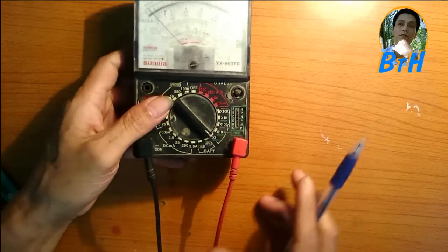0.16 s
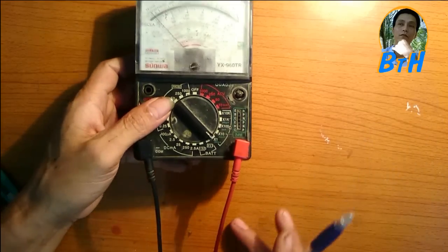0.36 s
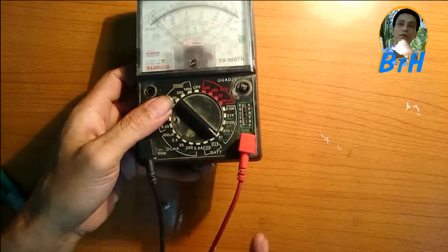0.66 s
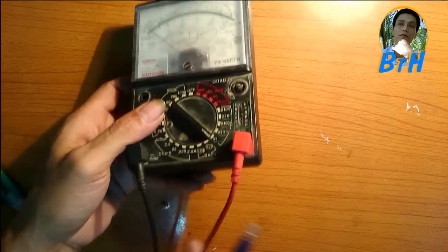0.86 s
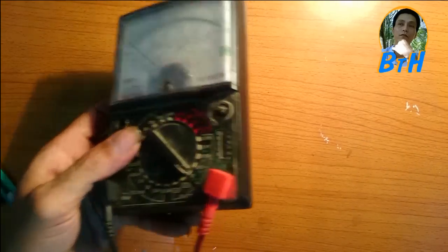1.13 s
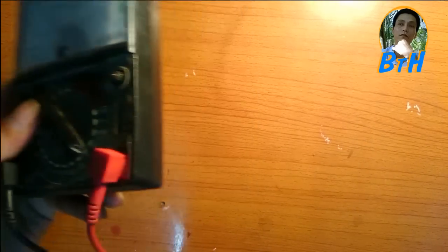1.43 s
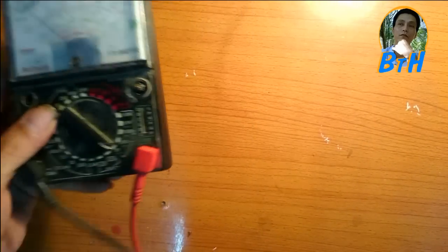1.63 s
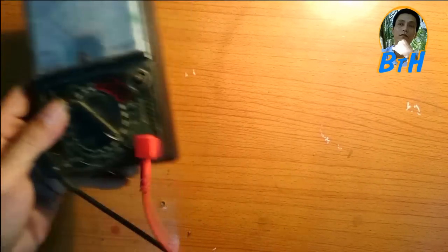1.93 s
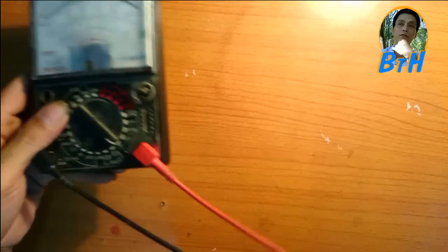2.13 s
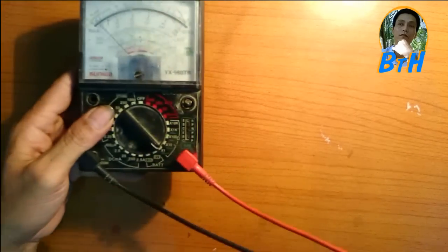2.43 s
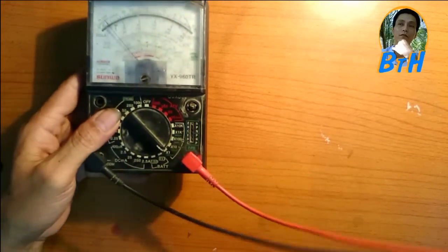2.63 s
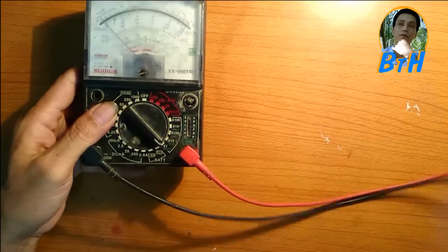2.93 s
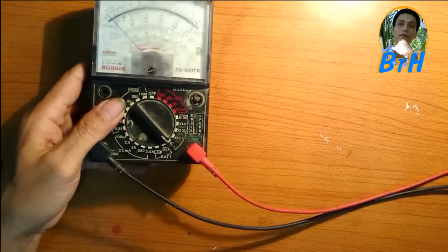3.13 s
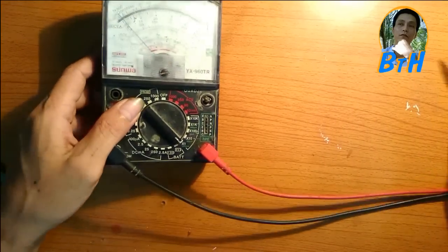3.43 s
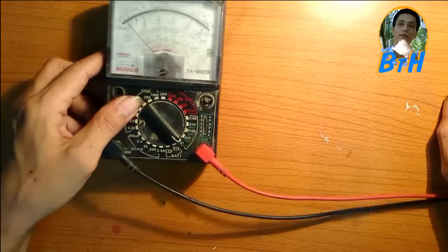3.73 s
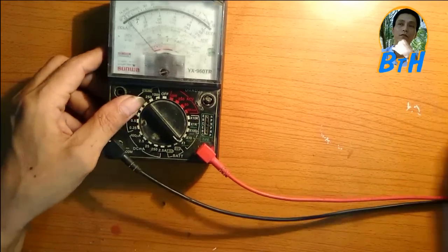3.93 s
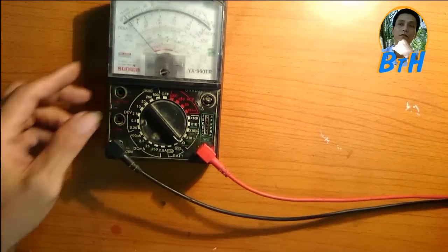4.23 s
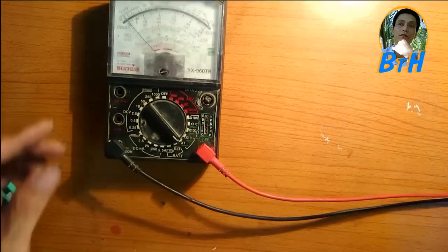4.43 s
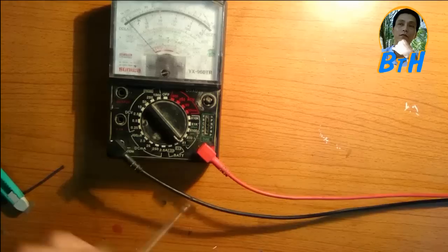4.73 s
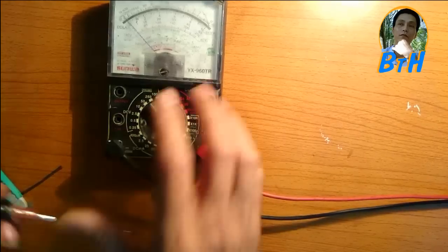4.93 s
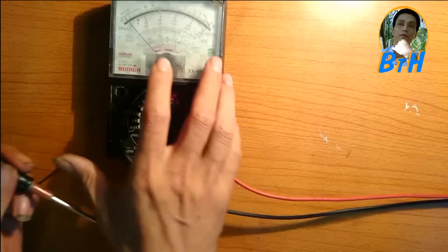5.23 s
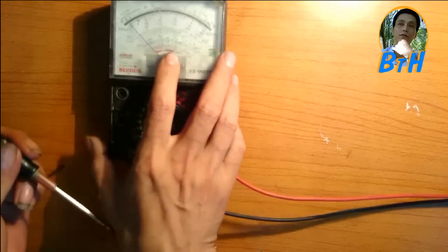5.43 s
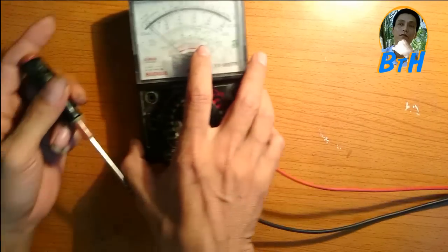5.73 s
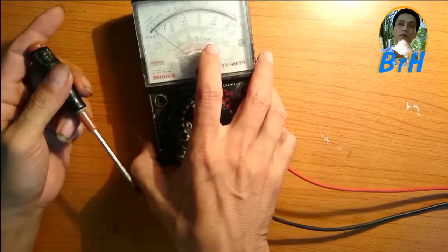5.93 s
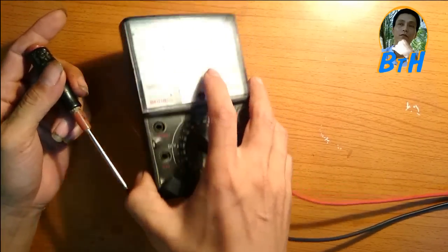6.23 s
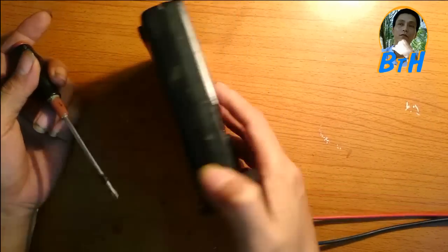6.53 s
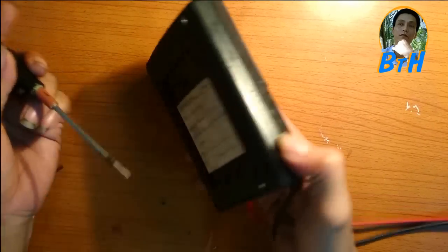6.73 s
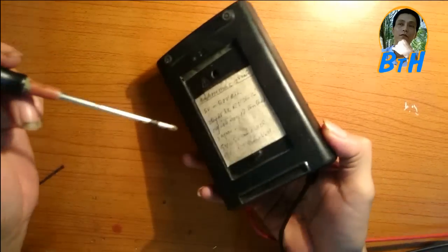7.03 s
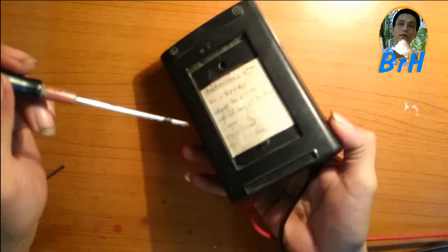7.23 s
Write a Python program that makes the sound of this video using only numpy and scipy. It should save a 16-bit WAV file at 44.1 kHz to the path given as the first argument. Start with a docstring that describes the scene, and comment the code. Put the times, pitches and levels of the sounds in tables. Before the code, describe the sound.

Light knocks and sharp clicks of a plastic meter case handled on a wooden table, with soft scrapes over a low hum.

```python
"""Hands busy at a wooden table

Hands move a small plastic meter, its leads and a few tools about on a wooden table in a quiet room.
Knocks ring the case and the table top as dying tones; hard parts click in short bursts of noise.
Sliding things hiss in uneven grains. A hum, a rumble, a far engine, a faint far tone and air hiss lie
under it, with a thin squeak. Two microphone ports listen; the right one takes up more of the wood's bass.
"""
import sys
import numpy as np
from scipy import signal
from scipy.fft import rfft, irfft, next_fast_len
from scipy.io import wavfile
from scipy.ndimage import uniform_filter1d

SR = 44100
rng = np.random.default_rng(int(sys.argv[2]) if len(sys.argv) > 2 else 0)


def persist_wave(psi):
    """Save psi, clipped to +-1, as 16-bit WAV."""
    counts = np.round(np.clip(psi, -1, 1) * 32767).astype(np.int16)
    wavfile.write(sys.argv[1], SR, np.atleast_2d(counts).T)


N = 324569  # length in samples

# Room tone and microphone hiss. Each row: pitch in Hz, strength in dB (only the shape counts).
AIR_SPECTRUM = [(35, -54.5), (60, -9.5), (98, -24.5), (149, -28.5), (243, -35.5), (300, -32.5), (361, -36),
                (467, -36.5), (576, -32.5), (647, -34), (727, -38.5), (4700, -43), (5800, -34.5),
                (6510, -40), (15800, -56)]
# How the air changes. Each row: time in seconds, hiss level in dB, lift of the bass in dB.
AIR_LEVEL = [(0.0, -65, 3), (0.92, -66.5, 10.5), (1.62, -66, 8), (2.7, -70, 8.5), (3.0, -64, 4.5),
             (3.7, -69, 20.5), (3.87, -58.5, 19), (4.03, -70, 22.5), (4.39, -64.5, 6), (4.61, -71, 13),
             (5.23, -69.5, 9), (5.79, -63, -5), (6.01, -69, 4), (6.47, -63.5, 5.5), (6.79, -70, 12),
             (7.2, -69.5, 9), (7.21, -61, 12.5), (7.36, -61.5, 20.5)]
# How alike the air is at both ports. Each row: pitch in Hz, likeness (1 is the same, 0 unrelated).
AIR_LIKENESS = [(60, 0.076), (180, 0.44), (550, 0.46), (1650, 0.076), (4970, -0.051), (15000, 0.51)]
# Balance of the air. Each row: pitch in Hz, left minus right in dB.
AIR_BALANCE = [(60, -3.5), (180, -4), (550, 1), (1650, 0.5), (4970, -1), (15000, 8.5)]
# The hum swells and sinks. Each row: time in seconds, level midway between the ports in dB.
HUM_LEVEL = [(0.0, -58), (0.12, -53), (1.0, -78), (1.41, -56), (1.8, -63), (3.26, -47), (4.26, -62),
             (4.37, -51), (4.67, -54), (4.73, -42.5), (4.9, -57), (4.94, -49.5), (5.43, -57.5), (5.49, -75),
             (5.62, -61), (7.17, -59.5), (7.26, -42.5), (7.36, -40.5)]
# The rumble swells and sinks. Each row: time in seconds, level at the right port in dB.
RUMBLE_LEVEL = [(0.0, -48), (1.6, -46), (1.66, -81), (1.76, -34), (1.86, -48.5), (1.99, -33.5), (2.17, -52),
                (2.29, -39), (3.22, -36), (4.78, -32), (4.96, -46), (5.08, -33.5), (5.68, -54), (6.01, -30),
                (6.74, -58.5), (7.13, -35), (7.15, -36), (7.36, -52)]
# Steady tones of a far idling engine. Each row: pitch in Hz, level in dB before the gain below.
ENGINE_LINES = [(81, -63), (108, -67.5), (136, -63), (163, -64.5), (190, -76.5), (245, -77.5)]
# The engine comes and goes. Each row: time in seconds, gain in dB.
ENGINE_GAIN = [(0, -8), (.5, -5.5), (1.5, -1.5), (2.6, -1), (3.3, -5.5), (4.2, -4), (4.8, -21)]
# A faint far tone. Each row: time in seconds, pitch in Hz, level in dB.
HOOT = [(4.95, 733, -92), (5.03, 753, -77), (5.085, 730, -73), (5.2, 720, -94.5)]
# A thin high squeak. Each row: time in seconds, pitch in Hz, level in dB.
SQUEAK = [(2.0, 10800, -74), (2.084, 11200, -86), (2.148, 11300, -68), (2.224, 10300, -87),
          (2.296, 11000, -84), (2.41, 10600, -90)]
# Tones of the plastic case, in a low, a middle and a high family.
# Each row: pitch in Hz, level in dB within its family, seconds to die by 60 dB at factor 1.
CASE_TONES = [
    [(468.8, -10, 0.24), (504.6, -5, 0.1), (638.6, 13, 0.034), (634, -18.5, 0.43), (755, -6, 0.11)],
    [(1123, 4, 0.028), (1230, 9.5, 0.025), (1439, -4.5, 0.055)],
    [(1752, -5.5, 0.05), (2163, -12, 0.027)],
]
# Tones of the table top, with the same families and columns.
TABLE_TONES = [
    [(86, 0, 0.64)],
    [(120, 4.5, 0.22), (140.3, 5.5, 0.26), (177.2, -9, 0.22)],
    [(215.4, -2, 0.24), (240, 2.5, 0.18), (282.8, -4.5, 0.22), (342, -2.5, 0.07)],
]
# Sliding strokes. Each row: strongest moment in seconds, swell in seconds, fade in seconds,
# scratch of the contact in dB, its fine hiss in dB, case ring in dB, table ring in dB.
SLIDES = [(0.49, 0.1, 0.043, -75, -86, -59, -66), (0.61, 0.021, 0.065, -78, -67, -85, -66),
          (1.419, 0.018, 0.083, -57, -56.5, -56, -43), (1.513, 0.091, 0.11, -56.5, -56, -62, -50.5),
          (1.669, 0.0091, 0.16, -59.5, -64, -54.5, -57), (1.769, 0.053, 0.032, -72, -73, -65, -74),
          (2.066, 0.11, 0.078, -68.5, -63, -68.5, -68), (2.75, 0.012, 0.035, -55.5, -55, -52, -52),
          (2.784, 0.028, 0.044, -61, -58.5, -60.5, -57), (2.919, 0.052, 0.066, -59, -60, -54.5, -52),
          (2.998, 0.036, 0.051, -56.5, -53.5, -57, -62), (3.363, 0.007, 0.19, -71, -73, -64, -63),
          (3.7, .006, 0.025, -73, -46, -63, -51), (3.799, 0.052, 0.07, -43, -45, -47, -59),
          (4.163, 0.012, 0.035, -63, -87, -65, -46), (4.265, 0.023, 0.063, -66, -68, -63.5, -58.5),
          (4.325, 0.0095, 0.099, -90, -63, -88, -74), (4.43, 0.012, 0.091, -57, -60, -60, -65),
          (5.748, .2, 0.3, -61.5, -58, -52.5, -49.5), (6.04, 0.0077, 0.41, -91, -74, -64, -74),
          (6.338, 0.13, 0.11, -63.5, -68.5, -55, -58.5), (6.45, 0.15, 0.15, -69.5, -70, -65.5, -61.5),
          (6.569, 0.079, 0.12, -67.5, -89.5, -64.5, -59), (6.771, 0.015, 0.15, -73, -71.5, -71, -60.5)]
# Colour of the sliding noise. Each row: pitch in Hz, strength in dB (only the shape counts).
SLIDE_SPECTRUM = [(880, -31.5), (1500, -12), (2050, -31), (2200, -4), (4800, -8.5), (8970, -24),
                  (13900, -23.5), (15500, -32)]
# Clicks of hard parts. Each row: time in seconds, level in dB, centre in Hz, width in octaves,
# push towards the left in dB.
CLICKS = [(0.724, -49, 5540, 0.8, 8), (0.749, -46, 3050, 1, 8), (0.954, -54.5, 4130, 0.95, 14),
          (1.015, -45.5, 6300, 0.77, 12), (1.404, -34.5, 6540, 0.51, 14), (1.5064, -49, 7140, 0.52, 17),
          (1.515, -39.5, 6660, 0.23, 19), (1.523, -44, 6000, 0.32, -4), (2.7387, -44.5, 5850, 0.52, 19),
          (2.745, -40.5, 5850, 0.38, 6), (2.7764, -50, 7800, 0.41, 26), (2.8803, -29, 2900, 0.79, 5.5),
          (2.9838, -35.5, 6000, 1.1, 12), (2.997, -35.5, 5000, 0.8, 5), (3.48, -45.5, 3900, 0.52, 13),
          (3.691, -38, 4500, 0.83, 9.5), (3.723, -51, 5070, 0.6, 0), (3.7508, -17.5, 5010, 0.92, 22),
          (3.753, -14.5, 4000, 0.8, 3), (3.794, -26.5, 3830, 0.85, 2), (3.8272, -21, 3340, 0.94, 6.5),
          (4.0295, -43, 3070, 0.9, 10), (4.151, -46.5, 4500, 0.36, 15), (4.252, -49, 3100, 0.65, 6),
          (4.3214, -50.5, 6250, 0.38, 23.5), (4.383, -49.5, 6080, 0.73, 14), (4.421, -51.5, 8670, 0.6, 22),
          (4.4282, -43.5, 7260, 0.3, 16.5), (5.749, -33.5, 6350, 0.75, 5), (6.568, -59, 3430, 0.42, 3.5)]
# Knocks. Each row: start in seconds, case level in dB, hardness in dB (lifts the case's high tones and
# lowers its low ones), table level in dB, lift of the table's high tones in dB, factor on the
# table's ring times (under 1 dies sooner, over 1 rings longer), push of the case towards the left in dB.
KNOCKS = [(0.1953, -26.5, 5.5, -31.5, -10, 1.13, 4), (0.2115, -33.5, -0.5, -43, -21, 0.95, 4),
          (0.3733, -72, -7, -70, 0, .6, 1), (0.539, -37.5, -0.5, -33, -4.5, 0.72, 1),
          (0.5475, -45.5, -8.5, -41, 2, 0.44, 14), (0.7506, -48, 1, -39, 4, 0.69, -3),
          (1.1976, -81, -10, -48.5, 10, 0.51, 2), (1.318, -60, 2, -62, 3, 0.51, 3),
          (1.406, -44.5, 8.5, -55, 25, 0.42, 6), (1.4644, -62, -15, -59.5, 29, 0.49, -13),
          (1.5188, -60, -11, -60, 11, 0.88, 13), (1.6663, -51.5, -12, -47, 15, 0.15, -2),
          (1.7594, -64, -16, -52, -3, 0.72, -1), (2.7394, -56, -12, -45, -23, .45, 10),
          (2.8811, -42.5, 11.5, -38.5, 3, 0.65, 11), (3.1141, -26.5, 4, -33, -5.5, 1.06, 4),
          (3.477, -24.5, 3, -28, 2, 0.74, 2.5), (3.7486, -29, 11, -48, 12.5, 0.97, 3.5),
          (3.8265, -14, 11, -28.5, -1.5, 2.17, 2.5), (3.8457, -20, 6.5, -38, -11.5, .3, 5),
          (4.1524, -55.5, -4, -40.5, 9.5, 0.99, 1.5), (5.3706, -54.5, 4, -71.5, -3, .9, 13.5),
          (5.397, -48, 5, -61, 4.5, 0.78, -1.5), (5.7014, -40.5, 1.5, -56, -11, .8, 1),
          (5.7492, -30, 8.5, -38, -18, 1.4, 3.5), (6.1958, -56.5, 10, -56, -8, 0.7, 0),
          (6.276, -50, 7, -54, -9, 0.8, 4.5), (6.3154, -39, 5, -35.5, 0.5, 0.85, 0.6),
          (6.357, -46.5, 11, -62, -4, .7, -1), (6.5232, -50.5, 9, -65.5, 3, .67, 0.1),
          (6.56, -55, -5.5, -40, -0.5, 0.89, -0.5), (6.6565, -55.5, -13, -34.5, 12.5, 0.44, 0),
          (6.7446, -59.5, -12, -36.5, 2, 0.64, 5.5)]
# How long the room rings. Each row: pitch in Hz, seconds to die by 60 dB.
ROOM_RING = [(150, 0.13), (600, 0.24), (2000, 0.34), (6000, 0.34), (14000, 0.28)]
# Single reflections. Each row: delay in seconds, level in dB.
ECHOES = [(0.017, -26.5), (0.034, -26.5)]
# How the ports differ for near sounds. Each row: pitch in Hz, left minus right in dB.
PORT_BALANCE = [(60, -13), (99, -4.5), (160, -7), (270, 14), (450, -10.5), (740, 3.5), (1220, -0.5),
                (2010, 2.5), (3330, 7.5), (5500, -3), (9080, 10.5), (15000, 9.5)]

PATCHES_DB = 1.6  # how uneven the air is
HUM_HZ, HUM_DRIFT_HZ, HUM_WAVER_DB = 51.3, 1.51, 2
RUMBLE_LUMPS_DB = 3  # how uneven the rumble is
RUMBLE_SIDE_DB, RUMBLE_SWAY_DB = -22.5, 1  # left minus right, and how far that wanders
STROKE_DEPTH_DB, STROKE_BEND = -26.5, 1.215  # level at both ends of a stroke; a bend over 1 rounds its top
DRONE_DB, DRONE_RISE_S = -2, 0.05  # drone beside the table ring, and its swell
CLICK_S = 0.0044  # a click dies to about a third in this time
CASE_LOW_DB, CASE_HIGH_DB = -3, -18.5  # beside the middle tones, at hardness 0
CASE_HIGH_SLOPE = 1.8  # dB gained by the high tones for each dB of hardness
TABLE_LOW_DB, TABLE_HIGH_DB = -13, -11.5  # beside the middle tones, at lift 0
TABLE_LOW_SLOPE = 0.1  # the deep tone answers the lift by this share
TABLE_SIDE_DB = -15  # left minus right
EDGE_HZ = 15900  # upper limit of the recorder


def amp(db):
    """Turns decibels into a plain factor."""
    return 10 ** (np.asarray(db) / 20)


def evened(x):
    """Scales a signal to an average strength (RMS) of 1."""
    return x / np.sqrt(np.mean(x ** 2) + 1e-20)


def read(points, hz):
    """Looks a spectrum up on a log-frequency axis."""
    f, value = np.transpose(points)
    return np.interp(np.log(hz + 1), np.log(f + 1), value)


def curves(rows, t):
    """Joins the rows of a table by straight lines in time."""
    s, *columns = np.transpose(rows)
    return [np.interp(t, s, column) for column in columns]


def add(mix, s, sound, side_db):
    """Lays a sound into both channels at time s, pushed to the left by side_db."""
    part = mix[:, round(s * SR):][:, :sound.shape[-1]]
    placed = amp([[side_db / 2], [-side_db / 2]]) * sound
    part += placed[:, :part.shape[1]]


def coloured(x, gain):
    """Filters x by gain(Hz)."""
    size = next_fast_len(x.shape[-1])
    spectrum = rfft(x, size) * gain(np.fft.rfftfreq(size, 1 / SR))
    return irfft(spectrum, size)[..., :x.shape[-1]]


def wander():
    """A slow random curve with nothing faster than 6 Hz."""
    return evened(coloured(rng.standard_normal(N), lambda f: f < 6))


def ring(modes, rise, length=1):
    """The dying tones of one family, peak 1; the contact lasts a moment, so they swell."""
    t = np.arange(round(0.6 * SR)) / SR
    tones = sum(amp(db - 60 * t / (t60 * length)) * np.sin(2 * np.pi * hz * t)
                for hz, db, t60 in modes)
    tones *= np.sin(np.pi / 2 * np.minimum(t / rise, 1)) ** 2
    return tones / abs(tones).max()


def convolved(x, tones):
    """Lets every grain of a noise set off the given tones."""
    return evened(signal.oaconvolve(x, np.atleast_2d(tones))[:, :N])


def air():
    """Room tone and hiss from random short-time spectra with faint patches; the bass follows its own lift."""
    frames, hz = N // 256 + 5, np.fft.rfftfreq(1024, 1 / SR)
    a, b, c, d, patches = rng.standard_normal((frames, 513, 5)).T
    patches = uniform_filter1d(patches, size=12, axis=0)  # smooth over pitch
    patches = evened(uniform_filter1d(patches, size=14, axis=1))  # smooth over time
    same = np.clip(read(AIR_LIKENESS, hz), -1, 1)[:, None]
    left = a + 1j * b
    right = same * left + np.sqrt(1 - same ** 2) * (c + 1j * d)
    colour = amp(read(AIR_SPECTRUM, hz) + read(AIR_BALANCE, hz) * [[0.5], [-0.5]])
    z = np.array([left, right]) * colour[..., None] * amp(PATCHES_DB * patches)
    top = (hz > 2500)[:, None]
    high, low = (signal.istft(z * part, nperseg=1024, noverlap=768)[1][:, :N] for part in (top, ~top))
    hiss_db, lift_db = curves(AIR_LEVEL, np.arange(N) / SR)
    bass_share = lambda f: 1 / (1 + (f / 300) ** 2)
    bass = coloured(low * amp(lift_db), bass_share)
    rest = coloured(low, lambda f: 1 - bass_share(f))
    return amp(hiss_db) * (high + bass + rest) / high.std()


def hum():
    """One low tone that drifts in pitch and wavers in level."""
    level = amp(curves(HUM_LEVEL, np.arange(N) / SR)[0] + HUM_WAVER_DB * wander())
    turns = np.cumsum(HUM_HZ + HUM_DRIFT_HZ * wander()) / SR
    return np.sqrt(2) * level * np.sin(2 * np.pi * turns) * amp([[-2.5], [2.5]])


def rumble():
    """Lumpy noise, mostly between 7 and 22 Hz, that differs at each port."""
    right_db = curves(RUMBLE_LEVEL, np.arange(N) / SR)[0] + RUMBLE_LUMPS_DB * wander()
    side_db = RUMBLE_SIDE_DB + RUMBLE_SWAY_DB * wander()
    band = lambda f: f ** 2 / (f ** 2 + 6.6 ** 2) / (1 + (f / 22) ** 8)
    a, b = coloured(rng.standard_normal((2, N)), band)
    return amp([right_db + side_db, right_db]) * [evened(a), evened(a + 0.21 * b)]


def engine():
    """The tones of a far idling engine, all following one speed."""
    clock = np.cumsum(1 + 0.0027 * wander()) / SR  # its speed is not quite even
    tones = sum(np.sqrt(2) * amp(db) * np.sin(2 * np.pi * (hz * clock + rng.random()))
                for hz, db in ENGINE_LINES)
    gain_db = curves(ENGINE_GAIN, np.arange(N) / SR)[0]
    return tones * amp(gain_db + [[-1.5], [1.5]])


def tone(rows, side_db, flicker_db):
    """A near sine that glides and flickers."""
    out, t = np.zeros((2, N)), np.arange(rows[0][0], rows[-1][0], 1 / SR)
    hz, db = curves(rows, t)
    flicker = uniform_filter1d(rng.standard_normal(len(t)), size=400)
    db += flicker_db * evened(uniform_filter1d(flicker, size=400))
    wave = np.sqrt(2) * amp(db) * np.sin(2 * np.pi * np.cumsum(hz) / SR)
    add(out, t[0], wave * signal.windows.tukey(len(t), 0.1), side_db)
    return out


def slides():
    """Uneven grains of contact hiss by themselves and shake the case and the table."""
    fine = evened(uniform_filter1d(rng.standard_normal(N), size=90))
    coarse = evened(uniform_filter1d(rng.standard_normal(N), size=300))
    grains = rng.standard_normal((2, N)) * amp(fine)
    slips = grains * amp(2.2 * coarse)  # the case sticks and slips
    contact = grains + 0.18 * grains[::-1]  # each port hears a little of the other's grains
    colour = lambda f: amp(read(SLIDE_SPECTRUM, f))
    below = lambda f: 1 / (1 + (f / 5000) ** 6)  # share below 5000 Hz
    scratch = evened(coloured(contact, lambda f: colour(f) * below(f)))
    hiss = evened(coloured(contact, lambda f: colour(f) * (1 - below(f))))
    case_tones = ring(CASE_TONES[1], 0.0014, 0.28) + 0.49 * ring(CASE_TONES[2], 0.0046, 0.12)
    table_tones = ring(TABLE_TONES[1], 0.0052) + 0.45 * ring(TABLE_TONES[2], 0.01)
    shell = convolved(slips + 0.15 * slips[::-1], case_tones)
    wood = convolved(grains.sum(0)[None], table_tones)[0]
    # a rubbed table also keeps the long low tones of the case singing
    drone = convolved(slips, ring(CASE_TONES[0], DRONE_RISE_S))
    light, heavy = np.zeros((2, 2, N))
    for s, swell, dies, scratch_db, hiss_db, case_db, table_db in SLIDES:
        at = np.arange(round((s - swell) * SR), round((s + dies) * SR))
        # 0 at the strongest moment, 1 at the ends
        away = np.where(at < s * SR, (s - at / SR) / swell, (at / SR - s) / dies)
        fade = amp(STROKE_DEPTH_DB * abs(away) ** STROKE_BEND)
        rub = amp(scratch_db) * scratch[:, at] + amp(hiss_db) * hiss[:, at]
        rub += amp(case_db) * shell[:, at] + amp(table_db + DRONE_DB) * drone[:, at]
        add(light, s - swell, fade * rub, 0.1)
        add(heavy, s - swell, fade * amp(table_db) * wood[at], TABLE_SIDE_DB)
    return light, heavy


def clicks():
    """A few milliseconds of crackle around a broad peak, partly different at each port."""
    out, t = np.zeros((2, N)), np.arange(2048) / SR
    envelope = np.minimum(t / 0.0011, 1) ** 2 * np.exp(-t / CLICK_S)
    for s, db, hz, width, side_db in CLICKS:
        def peak(f):
            hump = 0.08 + 1 / (1 + (np.log2(f / hz + 1e-9) / width) ** 4)
            return hump * f ** 4 / (f ** 4 + 1800.0 ** 4)  # little below 1800 Hz

        a, b, c = rng.standard_normal((3, 2048))
        noise = evened(coloured(np.array([a + 0.35 * b, a + 3.68 * c]), peak))
        add(out, s - 0.0005, amp(db) * noise * envelope, side_db)
    return out


def knocks():
    """Where and how hard a blow lands decides how much each family of tones sounds."""
    case, table = np.zeros((2, 2, N))
    low, middle, high = (ring(family, 0.0021) for family in CASE_TONES)
    t = np.arange(len(low)) / SR
    settles = 0.13 + 0.6 * np.exp(-(t / 0.0064) ** 2)  # a hand on the case soon damps the upper tones
    for s, case_db, hard_db, table_db, lift_db, length, side_db in KNOCKS:
        bright = middle + amp(CASE_HIGH_DB + CASE_HIGH_SLOPE * hard_db) * high
        shell = amp(CASE_LOW_DB - hard_db) * low + settles * bright
        deep, body, upper = (ring(family, 0.0059, length) for family in TABLE_TONES)
        wood = amp(TABLE_LOW_DB + TABLE_LOW_SLOPE * lift_db) * deep + body
        wood += amp(TABLE_HIGH_DB + lift_db) * upper
        add(case, s, amp(case_db) * shell, side_db)
        add(table, s, amp(table_db) * wood, TABLE_SIDE_DB)
    return case, table


def room(x, tail_db):
    """The reflected sound alone: clear echoes and sparse taps of random sign, each band dying at its own speed."""
    taps = np.zeros((2, SR // 2))
    at = np.arange(400, SR // 2 - 20, 20) + rng.integers(0, 20, (2, (SR // 2 - 401) // 20))
    np.put_along_axis(taps, at, rng.choice([-1.0, 1.0], at.shape), 1)
    hz, t, z = signal.stft(taps, SR, nperseg=256)
    dying = amp(-60 * t / read(ROOM_RING, hz)[:, None])
    tail = signal.istft(z * dying, SR, nperseg=256)[1]
    tail *= amp(tail_db) / np.linalg.norm(tail[0])
    for s, db in ECHOES:
        tail[:, round(s * SR)] += amp(db)
    return signal.fftconvolve(x, tail, axes=1)[:, :N]


def scene():
    """Knocks on the case and clicks go through the room; wood, slides and background arrive as they are."""
    background = air() + hum() + rumble() + engine() + tone(HOOT, 0.11, 3.7)
    squeak = tone(SQUEAK, 17.0, 2.4)
    light, heavy = slides()
    ticks = clicks()
    case, table = knocks()
    # knocks stay closer to the wood than clicks, so they send a little less into the room
    hits = case + ticks + room(amp(-0.5) * case + ticks, -9.5)
    near = coloured(hits + light, lambda f: amp(read(PORT_BALANCE, f) * [[0.5], [-0.5]]))
    return background + squeak + near + heavy + table


def record(dry):
    """The band limit of the recorder: a steep filter takes away the highest tones."""
    low_pass = signal.firwin(511, EDGE_HZ, window=("kaiser", 9), fs=SR)
    return signal.oaconvolve(dry, low_pass[None], "same")


dry = scene()
out = record(dry)
persist_wave(out)
```